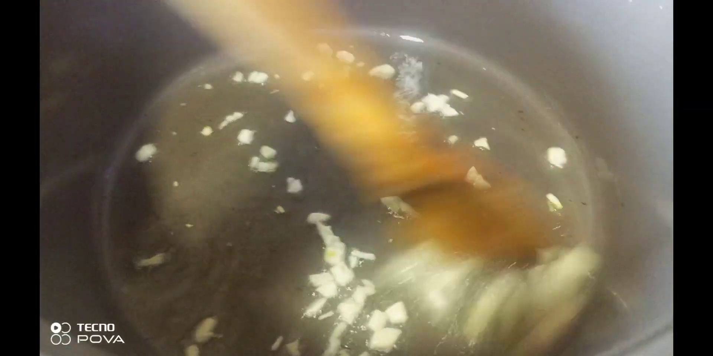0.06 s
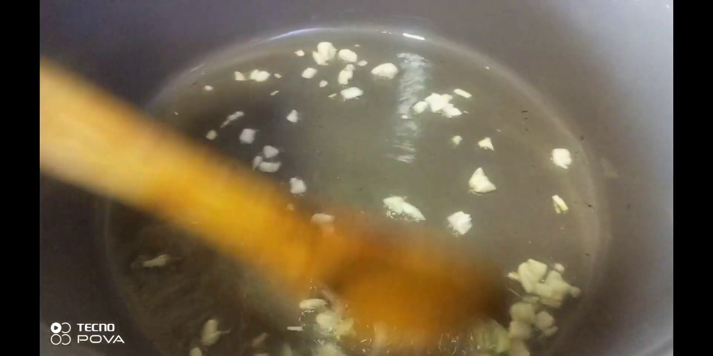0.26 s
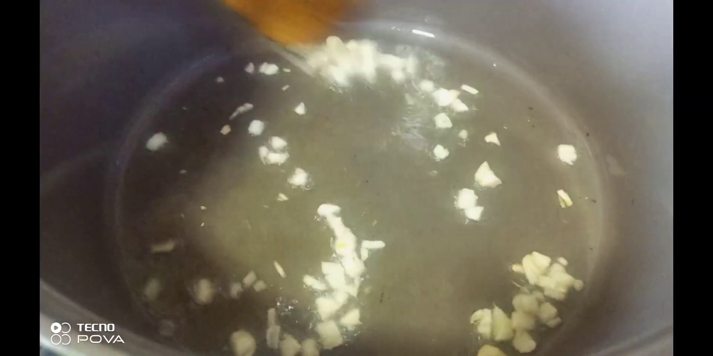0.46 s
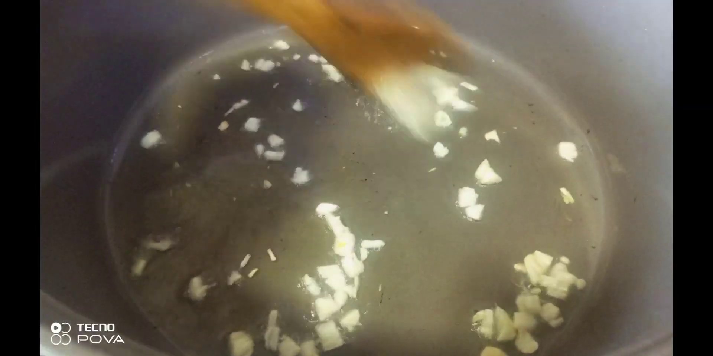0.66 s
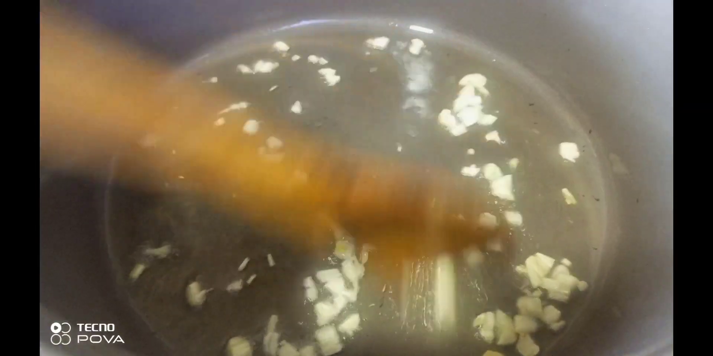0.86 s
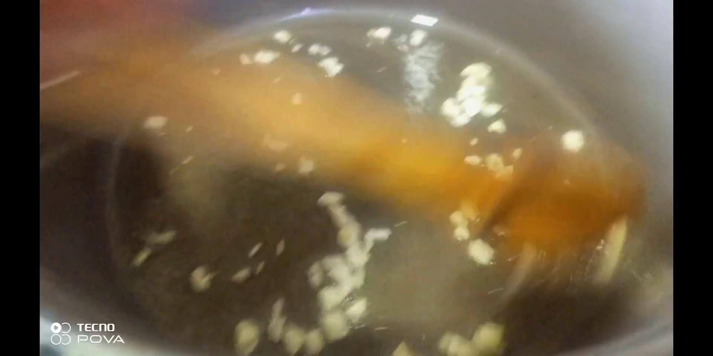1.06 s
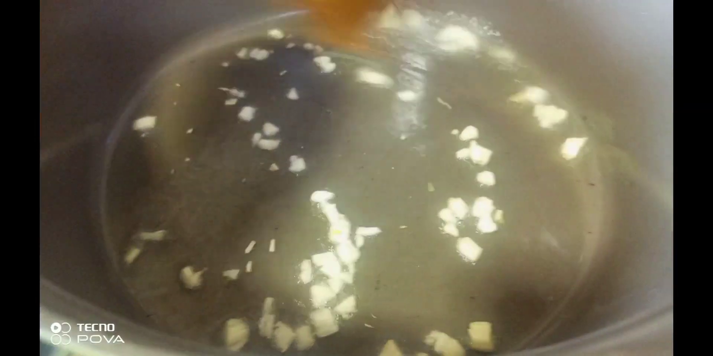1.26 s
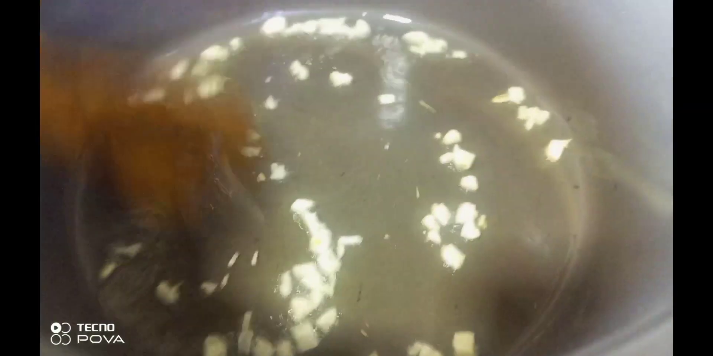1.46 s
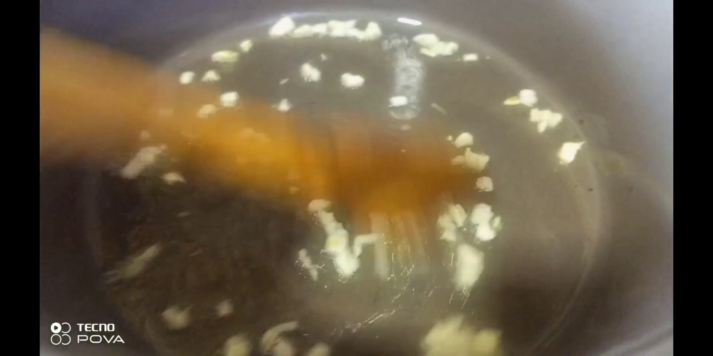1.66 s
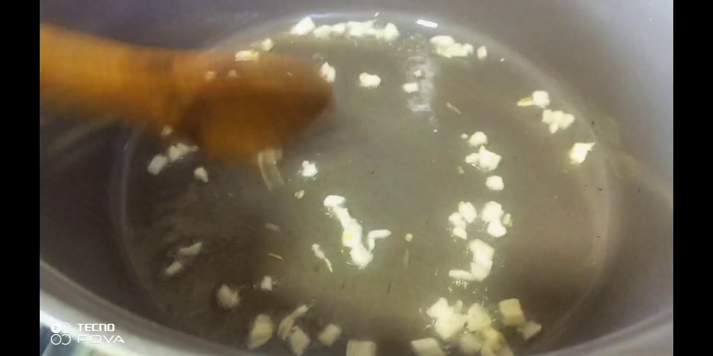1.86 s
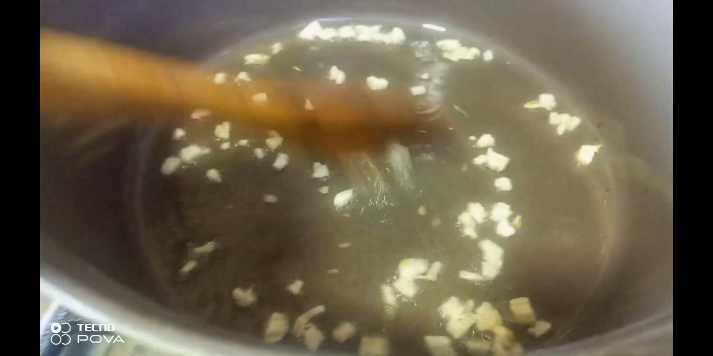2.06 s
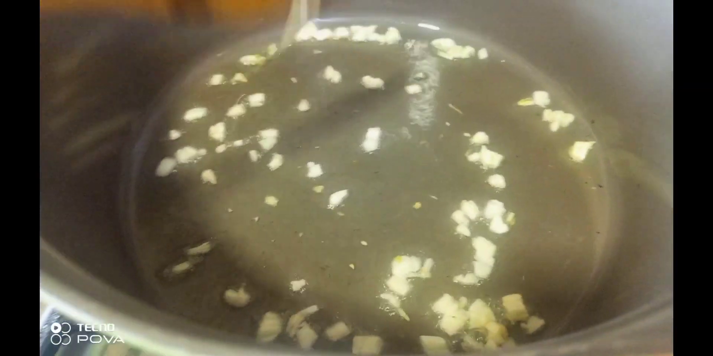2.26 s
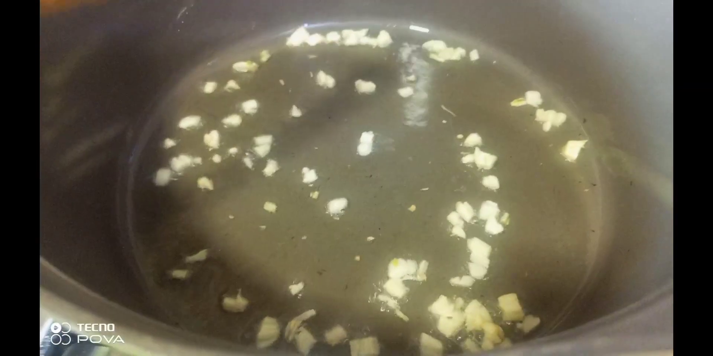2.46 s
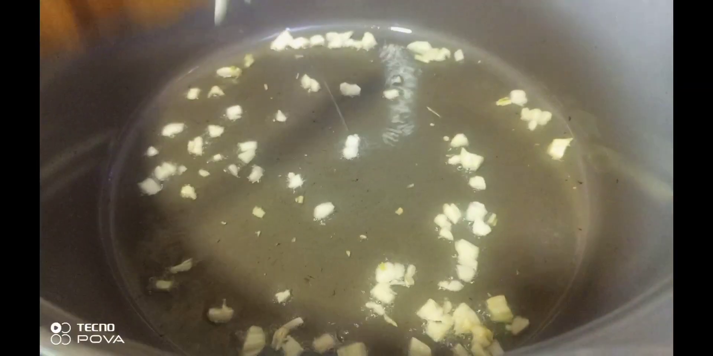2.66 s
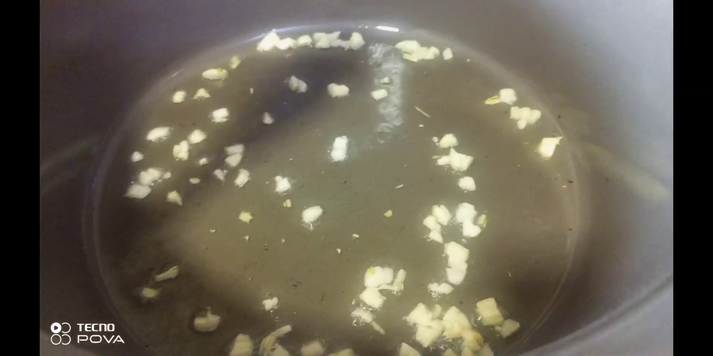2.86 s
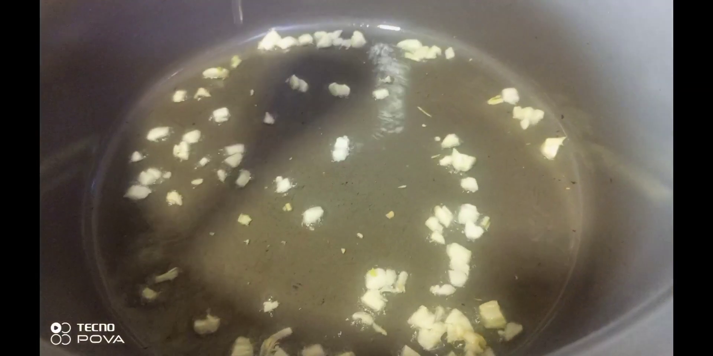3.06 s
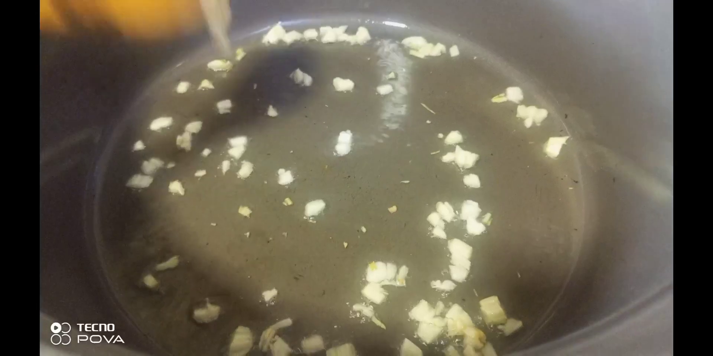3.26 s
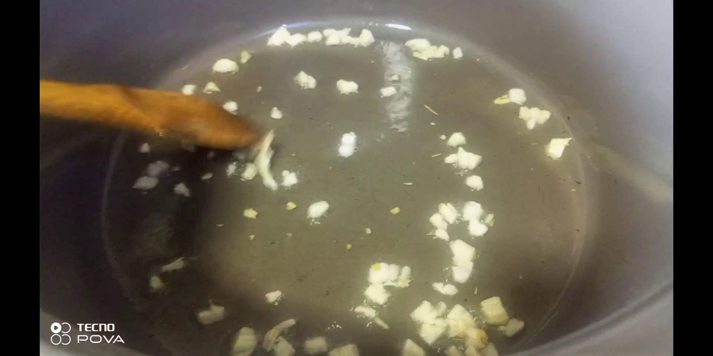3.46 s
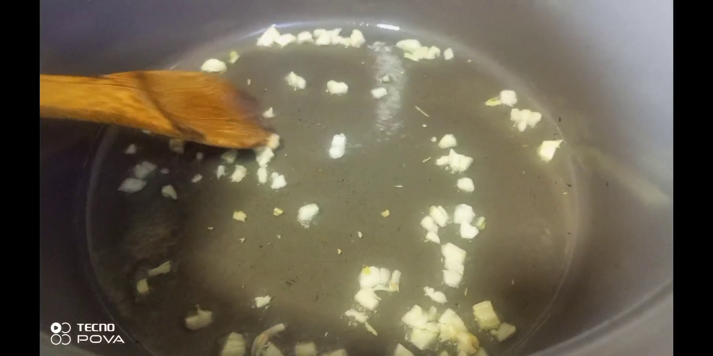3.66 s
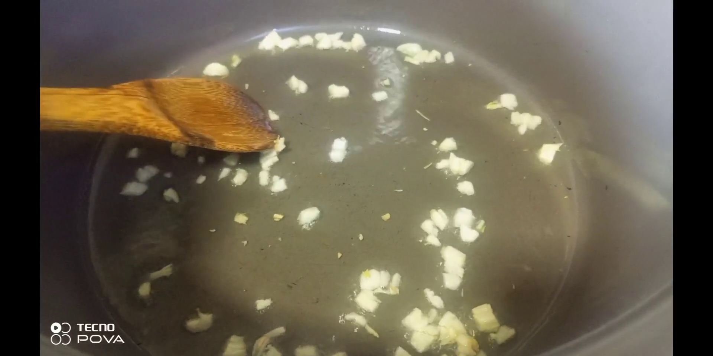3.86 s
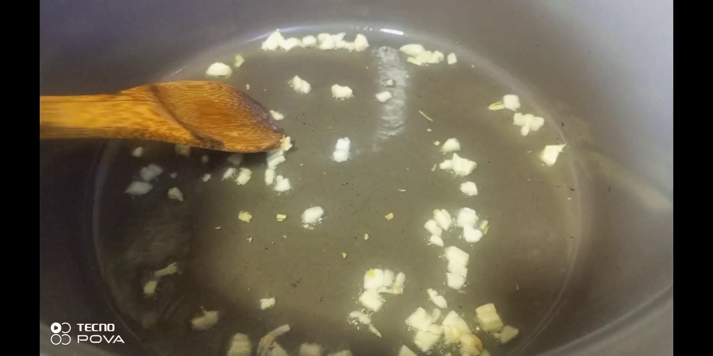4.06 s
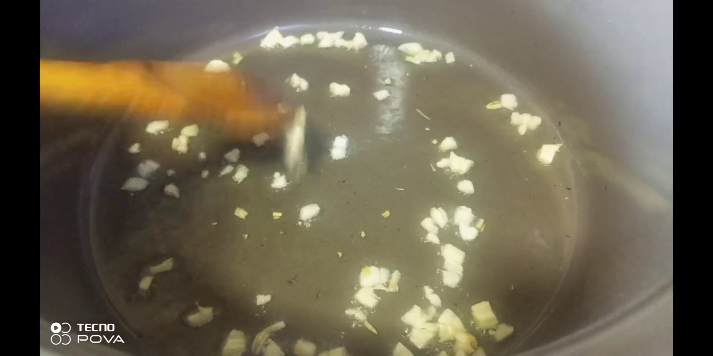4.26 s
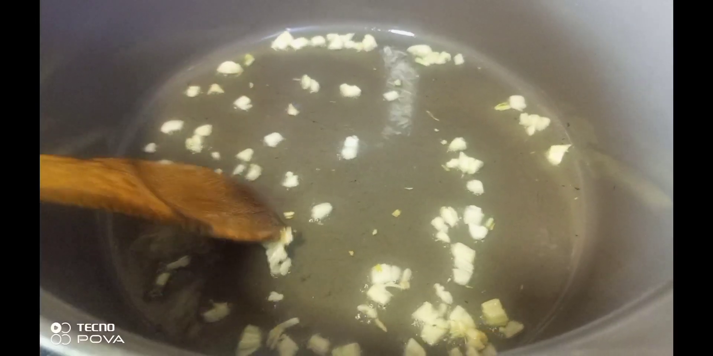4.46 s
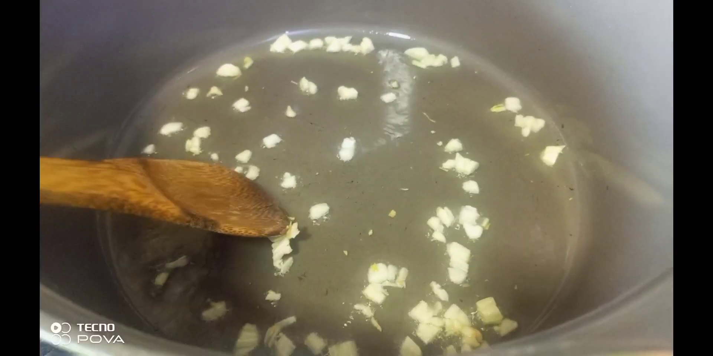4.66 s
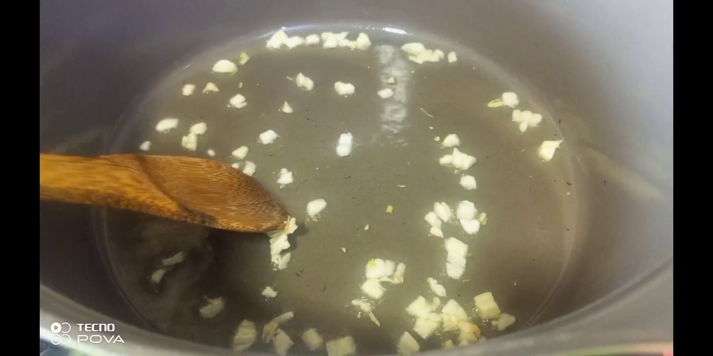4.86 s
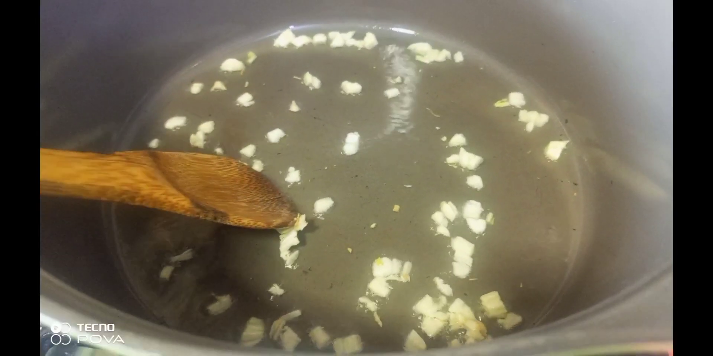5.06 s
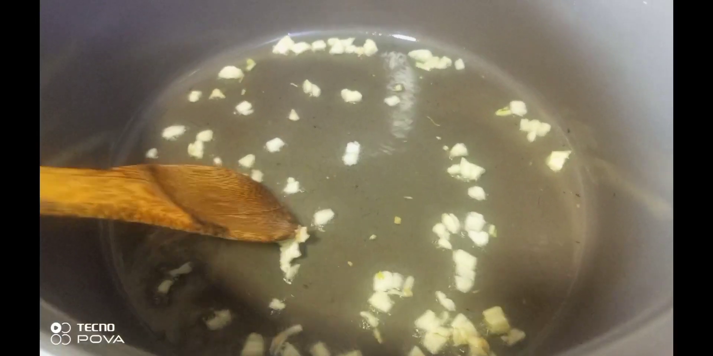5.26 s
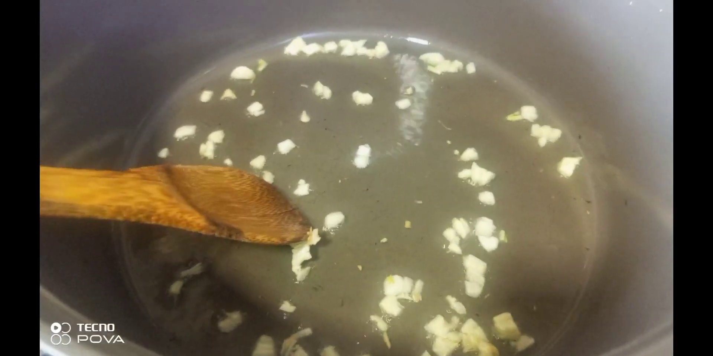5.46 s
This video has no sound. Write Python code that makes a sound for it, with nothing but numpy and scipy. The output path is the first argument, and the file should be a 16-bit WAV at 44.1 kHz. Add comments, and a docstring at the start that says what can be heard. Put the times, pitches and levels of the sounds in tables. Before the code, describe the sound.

Minced garlic fries in oil in a deep metal pot, heard closely from above on a phone microphone in a quiet kitchen. A fine, bright sizzle runs throughout, made of tiny crackles with a thin airy hiss. Crisp bubbles pop often in the first two seconds, one especially loud near 0.3, with short spits at about 0.2, 1.5 and 1.6. A wooden spatula touches the bottom very lightly, and soft low bumps come near 0.8 and 1.4. At 2.4 it knocks the pot with a clear, ringing clank over a low rumble, and the sizzle flares briefly. A second, brighter knock at 3.4 brings another small flare. Pops become sparser. At 4.25 and 4.4 two knocks fall close together, woodier and more chattering, with shorter ring. Then only subdued sizzle remains, with a few weak pops around 5.2 and a faint bump near 5.5.

```python
"""Kitchen stove: minced garlic fries in oil in a deep metal pot, heard from above.
Clicks and noise in bands make the fine sizzle; bubbles and spits burst as short noise bands that ring on.
A wooden spatula touches the bottom lightly and knocks the pot four times: decaying sines ring its walls.
Low resonances rumble under it, over faint room tone."""
import sys
import numpy as np
from scipy import signal
from scipy.fft import rfft, irfft
from scipy.io import wavfile
from scipy.ndimage import uniform_filter1d

SR = 44100
rng = np.random.default_rng(int(sys.argv[2]) if len(sys.argv) > 2 else 0)


def volts_from_db(level):
    """Convert decibel levels to linear amplitude ratios."""
    exponent = np.asarray(level, float) / 20
    return 10 ** exponent


def dump(signal):
    """Clip the signal to [-1, 1] and save it as 16-bit WAV at the path in sys.argv[1]."""
    limited = np.clip(np.atleast_2d(signal).T, -1, 1)
    pcm = np.round(limited * 32767).astype(np.int16)
    wavfile.write(sys.argv[1], SR, pcm)


N = 242991
T = np.arange(N) / SR

# frying: (time [s], sizzle level [dB], top hiss level [dB]), swells come on top
FRYING = [(0.0, -55, -74), (.33, -53, -69.5), (.63, -56.5, -68), (1.05, -57, -72), (1.46, -55, -68),
          (1.98, -55.5, -68.5), (2.25, -58, -69), (3.16, -60, -72), (4.54, -60.5, -71),
          (4.921, -61.5, -73.5), (5.51, -60.5, -70.5)]
# sizzle and top hiss swell just after a knock: (start [s], sizzle rise [dB], top hiss rise [dB], length [s])
SWELLS = [(2.46, 9, 9.5, 0.37), (3.38, 6.5, 9, 0.28)]
# filter of the sizzle: (frequency [Hz], relative gain [dB])
SIZZLE_COLOUR = [(880, -28), (1500, -18), (2070, -13.5), (2280, -15), (2950, -8.5), (3920, -7), (4650, -4),
                 (5170, -2.5), (6820, -1.5), (9000, -20), (11700, -24.5), (19800, -120)]
# filter of the top hiss: (frequency [Hz], relative gain [dB])
HISS_COLOUR = [(7000, -38), (9000, -6), (10800, -9.5), (11800, -18), (13800, -11), (14500, -3),
               (15100, -8.5), (15650, 3.5)]
# filter of the room tone: (frequency [Hz], relative gain [dB])
ROOM_COLOUR = [(30, -4.5), (80, -5.5), (300, -5.5), (660, -12.5), (900, -5), (1500, -8.5), (2500, -9.5)]
# steam bubbles: (time [s], nominal level [dB], pitch [Hz], nominal t60 [s], rise [ms])
BUBBLES = [(.039, -35.5, 4416, 0.091, 1.1), (.0962, -39.5, 5230, .12, 3.6), (.137, -44.5, 6180, 0.18, 3.5),
           (0.1562, -37, 4440, .066, 9.3), (0.167, -38, 5400, .059, 3.7), (0.2754, -22, 3410, 0.11, 0.62),
           (0.289, -34.5, 5560, .13, 2), (0.3296, -39, 6190, 0.045, 3), (.447, -41, 4970, 0.075, 3.3),
           (0.546, -29, 6050, 0.07, 1.4), (0.7032, -37, 6200, 0.098, 1.5), (0.8159, -36, 4450, 0.088, 5.5),
           (.823, -38, 5550, .09, 3.3), (0.875, -45, 4700, 0.11, 3), (0.882, -44.5, 7200, 0.056, 3),
           (0.9028, -30.5, 3660, 0.11, 2.8), (1.05, -38.5, 5950, 0.13, 5.3), (1.095, -36, 5700, 0.1, 6),
           (1.1185, -30, 5210, 0.048, 3), (1.2164, -37, 6950, 0.05, 1.3), (1.3762, -33.5, 4620, 0.11, 2.4),
           (1.387, -36.5, 5980, 0.13, 7), (1.5597, -33.5, 5750, 0.092, 10),
           (1.7452, -27.5, 5835, 0.13, 4.2), (1.785, -46, 3300, 0.094, 9.3), (1.8595, -42, 6500, 0.12, 12),
           (1.875, -43.5, 4260, 0.22, 4), (1.894, -39, 5520, 0.076, 3), (1.91, -44, 7060, 0.029, 1.8),
           (1.9221, -33, 5240, 0.11, 6), (2.0507, -31, 5770, 0.11, 3.5), (2.1164, -41, 5650, 0.035, 7.9),
           (2.1455, -44.5, 4450, .116, 4.1), (2.2764, -40.5, 4370, 0.16, 2.7),
           (2.2995, -39, 4120, 0.12, 9.3), (2.3748, -34, 6800, 0.059, 4.5),
           (2.5488, -34.5, 4000, 0.12, 1.3), (2.6428, -35, 6115, 0.071, 1.6),
           (2.654, -46.5, 3700, 0.081, 3.7), (2.7894, -37, 6110, .054, 4.1),
           (2.8173, -41.5, 5050, 0.11, 5.2), (2.9743, -42, 4450, 0.13, 7.9), (3.001, -41, 5720, 0.13, 2.4),
           (3.1043, -41, 4870, .16, 1.8), (3.34, -36.5, 5150, .15, 5.8), (3.5207, -39.5, 3690, 0.13, 5.1),
           (3.5527, -29.5, 5830, 0.057, 2.5), (3.7069, -36.5, 5520, 0.12, 2.9), (3.985, -47, 5570, 0.13, 4),
           (4.536, -41, 5850, 0.16, 4.1), (4.558, -33, 6720, 0.031, 1.6), (4.6407, -37.5, 4913, 0.091, 8.2),
           (4.655, -46.5, 6400, 0.16, 5), (4.9127, -48.5, 6720, 0.11, 4), (4.9277, -46, 6370, 0.037, 8),
           (5.199, -42.5, 4990, 0.21, 3.7)]
# spitting oil, short and wide: (time [s], nominal level [dB], centre [Hz], nominal width [Hz])
SPITS = [(.0215, -45, 6650, 1270), (.2038, -54.7, 10800, 990), (.218, -35.5, 5160, 1110),
         (.7995, -48, 8500, 900), (1.159, -52, 8450, 1210), (1.4704, -32.5, 6950, 1090),
         (1.6029, -37, 3870, 2510), (1.9609, -49.5, 10000, 3250), (2.521, -33.5, 4570, 2140),
         (3.4138, -40.5, 6440, 1200), (5.1589, -54.5, 9200, 1500), (5.205, -46.5, 8650, 900)]
# light spatula touches on the bottom: (time [s], nominal level [dB])
TAPS = [(0.033, -68), (.141, -64), (.275, -58), (1.222, -66), (1.376, -65), (1.514, -61.5), (1.605, -65),
        (1.793, -50), (1.92, -58.5), (2.008, -60), (2.279, -65), (4.051, -60.5)]
# low modes of the bottom: (frequency [Hz], relative level [dB])
BOTTOM_MODES = [(907, 4.5), (1419, 4), (2230, -2), (487, -12.5)]
# jolts: (time [s], nominal level [dB], relative deep thud [dB], relative lowest mode [dB], t60 [s])
JOLTS = [(.276, -64.5, -17, -19, 0.35), (.444, -80.5, 18, -3, 0.71), (.766, -51.5, -7, -23.5, .2),
         (1.434, -45.5, 1.5, -8.5, 0.28), (1.6, -61, -17, -23, 0.2), (1.861, -61, 0, -27, 0.22),
         (2.231, -58.5, 7.5, -4.5, 0.33), (2.436, -33, -11, -12, 1.21), (2.905, -60.5, -1, -4, 0.15),
         (3.257, -59, -3, -9, 0.16), (3.374, -38.5, -11.5, -5.5, 0.67), (3.872, -50.5, -2, -5.5, 0.2),
         (4.058, -55.5, -34, -6, .16), (4.247, -42, -5.5, -11, 0.87), (4.415, -51, -3, -15, 0.23),
         (4.674, -54, 0, -13.5, 0.39), (5.471, -54.5, 1, -10, 0.99)]
# stove modes: (frequency [Hz], width of one filter pass [Hz], relative level [dB])
STOVE_MODES = [(167, 56, 3), (303.4, 35, 6), (428.7, 88, -3.5), (496.4, 41, -7.5), (652, 550, -17.5)]
# spatula knocks: (time [s], level variation angle [rad], strength [dB], brightness [dB/octave], chatter [s])
KNOCKS = [(2.4445, 0.19, -0.14, -4.5, 0.0011), (3.372, 0.46, 0.65, -1.5, 0.0079),
          (4.2502, 0.544, 1.5, 2, 0.011), (4.4109, 0.64, -1.9, -3, 0.032)]
# pot wall modes: (highest level before knock strength [dB], t60 before damping by the wood [s])
WALL_MODES = [(-46.5, .93), (-44.5, 3.71), (-37.5, 2.93), (-48.5, 1.9), (-39.5, .16), (-55, 1), (-45, 2.24),
              (-43, 0.64), (-44, .28), (-49.5, 0.75), (-39, 0.42), (-60, 0.23), (-37, 0.16), (-40.5, 0.44),
              (-55, 0.26), (-35.5, 0.21), (-70, .19), (-39, 0.32), (-41, 0.21), (-43, 0.26), (-52, .24),
              (-42, 0.16), (-42, .17), (-39, 0.16), (-47, 0.32), (-28.5, 0.056), (-46, 0.46), (-43.5, .35),
              (-47, 0.28), (-51, .27)]
# pot wall modes: (frequency [Hz])
WALL_HZ = [490, 904, 1287, 1367, 1702, 1782, 1855, 2120, 2275, 2422, 2668, 2998, 3325, 3410, 3461, 3733,
           3870, 4011, 4130, 4280, 4435, 4910, 5211, 5378, 5566, 5755, 5819, 6180, 6422, 6584]
# numbers that vary each wall mode's level from knock to knock: (angle multiplier [1])
WALL_VARIATION = [7, 11, 10, 8, 3, 4, 7, 9, 9, 10, 11, 12, 4, 12, 9, 1, 5, 12, 10, 2, 2, 9, 12, 8, 1, 4, 12,
                  6, 12, 7]


def unit(x):
    """Scale to rms 1."""
    return x / np.sqrt(np.mean(x ** 2))


def coloured(x, points):
    """Filter by (frequency [Hz], gain [dB]) points, 90 dB down outside them; rms 1."""
    hz, db = np.transpose(points)
    log_f = np.log(np.fft.rfftfreq(N, 1 / SR) + 1)
    gain = volts_from_db(np.interp(log_f, np.log(hz), db, left=-90, right=-90))
    return unit(irfft(rfft(x) * gain, N))


def walk(rate_hz):
    """Random levels held 1 / rate_hz and slewed twice; spread near 1."""
    k = int(SR / rate_hz)
    held = np.repeat(rng.standard_normal(N // k + 1), k)
    return 1.3 * uniform_filter1d(uniform_filter1d(held, k), k)[:N]


def add(out, start_s, x):
    """Mix x into out from start_s."""
    i = int(start_s * SR)
    out[i:i + len(x)] += x[:len(out) - i]


def fade(t, t60_s):
    """Exponential decay of 60 dB in t60_s, at least 5 ms."""
    return np.exp(-np.log(1000) * t / np.maximum(t60_s, 1 / 200))


def crackle(rate_hz, spread_db, smear_t60_s):
    """Random clicks of exponential size in dB, each smeared by a short echo tail."""
    clicks = (rng.random(N) < rate_hz / SR) * volts_from_db(spread_db * rng.exponential(size=N))
    tail = rng.standard_normal(2048) * fade(T[:2048], smear_t60_s)
    return unit(signal.fftconvolve(clicks, tail)[:N])


def bottom_hum():
    """Noise through narrow resonances at the low modes of the bottom, each wavering in level."""
    hum = 0
    for hz, db in BOTTOM_MODES:
        mode = unit(signal.lfilter(*signal.iirpeak(hz, 30, SR), rng.standard_normal(N)))
        hum = hum + volts_from_db(db + 1.0 * walk(15)) * mode
    return volts_from_db(-85.5) * hum


def frying():
    """Tiny bubbles: a swarm of clicks over hiss in each third of an octave, so that they differ in pitch."""
    when_s, *levels_db = np.transpose(FRYING)
    sizzle_db, hiss_db = (np.interp(T, when_s, db) for db in levels_db)
    for start_s, more_db, more_hiss_db, length_s in SWELLS:
        swell = np.clip((T - start_s) / 0.023, 0, 1) * np.clip(1 - (T - start_s) / length_s, 0, 1)
        sizzle_db = sizzle_db + more_db * swell
        hiss_db = hiss_db + more_hiss_db * swell
    swarm = 0
    for hz in 1500 * 2 ** np.arange(0, 3.1, 1 / 3):
        grains = crackle(160, 3.08, 0.075) + volts_from_db(-3.0 + 2.2 * walk(18)) * rng.standard_normal(N)
        edges_hz = [hz / 2 ** (1 / 6), hz * 2 ** (1 / 6)]
        band = signal.butter(2, edges_hz, "band", fs=SR, output="sos")
        swarm = swarm + signal.sosfilt(band, grains)
    sizzle = coloured(swarm, SIZZLE_COLOUR) * volts_from_db(sizzle_db)
    fizz = volts_from_db(2.5 * walk(30)) * rng.standard_normal(N) + volts_from_db(-1.0) * crackle(360, 1.5, 0.0067)
    hiss = coloured(fizz, HISS_COLOUR) * volts_from_db(hiss_db)
    return sizzle + hiss + bottom_hum()


def room_tone():
    """Faint coloured noise, slowly wavering about -81 dB."""
    return volts_from_db(-81 + 2.0 * walk(5.04)) * coloured(rng.standard_normal(N), ROOM_COLOUR)


def pop(db, hz, t60_s, width_hz, rise_ms):
    """A burst is a short band round the bubble's pitch; its echoes in the pot keep a narrow core longest."""
    t = T[:8192]
    f = np.fft.rfftfreq(len(t), 1 / SR)
    echoes = rfft(rng.standard_normal((3, len(t))))
    away = (f - hz) / max(width_hz, 60)
    burst = unit(irfft(echoes[0] * np.exp(-(away / 1.11) ** 2) * (f > 900)))
    core = unit(irfft(echoes[1] * np.exp(-(away / 0.12) ** 2)))
    # the splash spreads wider, leans to lower pitches; deep, loud bubbles splash most
    splash_db = -13.0 + 8.6 * np.log2(5000 / hz) + 0.18 * (db + 37)
    reach_hz = np.where(away < 0, 1500., 600.)
    splash = unit(irfft(echoes[2] * np.exp(-np.abs(f - hz) / reach_hz) * (f > 900)))
    rise_s = max(rise_ms, .4) / 1000
    late = np.maximum(t - rise_s, 0)
    # the bubble's skin snaps at the top of the rise
    snap = volts_from_db(-8.5) * np.exp(-((t - rise_s) / 0.00077) ** 2)
    body = burst * (snap + fade(late, 0.91 * t60_s))
    body += volts_from_db(-7.5) * core * fade(late, 1.6 * t60_s)
    body += volts_from_db(splash_db) * splash * fade(late, 1.27 * t60_s)
    body *= np.sin(np.pi / 2 * np.clip(t / rise_s, 0, 1))
    # level is set by the rms round the top of the rise
    loud = np.sqrt(np.mean(body[int(rise_s * SR / 2):int((rise_s + .004) * SR)] ** 2))
    return volts_from_db(db - 6.5) * body / loud


def pops():
    """Large bubbles (the louder, the wider their band), oil spits and a random scatter of small pops."""
    out = np.zeros(N)
    for start_s, db, hz, t60_s, rise_ms in BUBBLES:
        width_hz = 407 * volts_from_db(0.21 * (db + 37.5))
        add(out, start_s, pop(db, hz, t60_s, width_hz, rise_ms))
    for start_s, db, hz, width_hz in SPITS:
        add(out, start_s, pop(db, hz, 0.048, width_hz, 3.5))
    # small pops follow the sizzle level, swells left out
    small_count = 40
    when_s, sizzle_db = np.transpose(FRYING)[:2]
    starts_s = T[-1] * rng.random(small_count)
    for start_s, (size, pitch) in zip(starts_s, rng.standard_normal((small_count, 2))):
        db = np.interp(start_s, when_s, sizzle_db) + 6 + 4.0 * size
        hz = 6300 * 2 ** (0.25 * pitch)
        add(out, start_s, pop(db, hz, 0.047, 910, 4.9))
    return out


def taps():
    """Light touches ring the low modes of the oil-covered bottom as decaying sines."""
    out, t = np.zeros(N), T[:SR // 2]
    hz, mode_db = np.array(BOTTOM_MODES).T[:, :, None]
    for start_s, db in TAPS:
        chance = rng.standard_normal((2, len(hz), 1))
        modes = volts_from_db(mode_db + 3 * chance[0]) * np.sin(2 * np.pi * hz * (1 + 0.005 * chance[1]) * t)
        envelope = fade(t, 0.16) * (1 - np.exp(-t / 0.0018))
        add(out, start_s, volts_from_db(db - 8.0) * modes.sum(axis=0) * envelope)
    return out


def rumble():
    """Jolts of the pot shake its stand: rattling noise in a few low resonances, over a deep thud."""
    shake = rng.standard_normal(N)
    modes = []
    for hz, width_hz, mode_db in STOVE_MODES:
        b, a = signal.iirpeak(hz, hz / width_hz, SR)
        rattle = volts_from_db(mode_db + 2.5 * walk(25))
        modes.append(rattle * unit(signal.lfilter(b, a, signal.lfilter(b, a, shake))))
    first, second, upper = modes[0], modes[1], unit(sum(modes[2:]))
    thud_band = signal.butter(3, [55, 125], "band", fs=SR, output="sos")
    deep = unit(signal.sosfilt(thud_band, rng.standard_normal(N)))
    out = 0
    for start_s, db, deep_db, first_db, t60_s in JOLTS:
        # light jolts favour the second mode, hard ones the upper modes
        second_db = -7.5 - 0.28 * (db + 52.5)
        t = np.maximum(T - start_s, 0)
        # the rumble is cut off at half of t60, as by a noise suppressor
        cut = np.clip((.5 - t / t60_s) / 0.25, 0, 1)
        # the lowest mode comes up late and decays more slowly
        lasting = volts_from_db(7.0) * (1 - np.exp(-t / 0.031)) / fade(np.minimum(t, t60_s), 6.3 * t60_s)
        envelope = volts_from_db(db - 9.0) * (1 - np.exp(-t / 0.0061)) * fade(t, t60_s) * cut
        low = volts_from_db(first_db) * lasting * first + volts_from_db(second_db) * second
        out = out + envelope * (upper + low + volts_from_db(deep_db) * deep)
    return out


def knocks():
    """Knocks ring the same walls at varied mode levels; the wood first cracks and chatters on the metal."""
    out, t = np.zeros(N), T[:SR]
    hz, variation = np.array(WALL_HZ)[:, None], np.array(WALL_VARIATION)[:, None]
    mode_db, t60_s = np.array(WALL_MODES).T[:, :, None]
    faint_db, crack_db = -62.5, -37
    crack_band = signal.butter(4, [1100, 6600], "band", fs=SR, output="sos")
    for start_s, angle_rad, db, bright_db, chatter_s in KNOCKS:
        # vary each mode's level from knock to knock
        mode_weight = np.sqrt(np.cos(variation * angle_rad) ** 2 + .01)
        gain = volts_from_db(mode_db + db + bright_db * np.log2(hz / 2000)) * mode_weight
        # longer chatter damps the walls more; the ring is cut short, as by a noise suppressor
        damped_t60_s = 7 * (0.0031 / chatter_s) ** 1.41
        cut_s = 0.25 + .103 * damped_t60_s
        late = np.maximum(t - chatter_s, 0.36 * t)
        chance = rng.random((5, len(hz), 1))
        ring = np.sin(2 * np.pi * (hz * t + chance[0]))
        # a dented pot splits its modes, the upper most, into close neighbours that beat
        split = .45 + .4 * np.clip(hz / 2700, 0, 1) ** 3
        for side, gap, phase in zip((-1, 1), chance[1:3], chance[3:]):
            near_hz = hz + side * (14 + 45 * gap)
            ring += split * fade(late, 1.0) * np.sin(2 * np.pi * (near_hz * t + phase))
        # faint tails drop out early
        decay = gain * fade(late, 1 / (1 / t60_s + 1 / damped_t60_s))
        size = np.sqrt(np.maximum(decay ** 2 - volts_from_db(faint_db) ** 2, 0))
        ring = (size * ring / np.sqrt(1 + 2 * split ** 2)).sum(axis=0)
        ring *= np.clip((cut_s - t) / (0.26 * cut_s), 0, 1) ** 1.1
        noise = signal.sosfilt(crack_band, rng.standard_normal(SR))
        crack_decay = fade(late, 0.044) + volts_from_db(-6 + 61 * chatter_s) * fade(late, 0.26)
        crack = volts_from_db(crack_db + db + 1.0 * bright_db) * noise * crack_decay
        onset = 1 - np.exp(-t / (0.00019 + 0.043 * chatter_s))
        add(out, start_s, (ring + crack) * onset)
    return out


def scene():
    """All sources at one microphone."""
    return (frying() + room_tone() + pops() + taps() + rumble() + knocks())[None]


def top_cut(x):
    """Nothing passes above the cut-off."""
    return signal.sosfilt(signal.butter(12, 15800, fs=SR, output="sos"), x)


def record(dry):
    """The finished mix as the phone keeps it."""
    return top_cut(dry)


dry = scene()
out = record(dry)
dump(out)
```